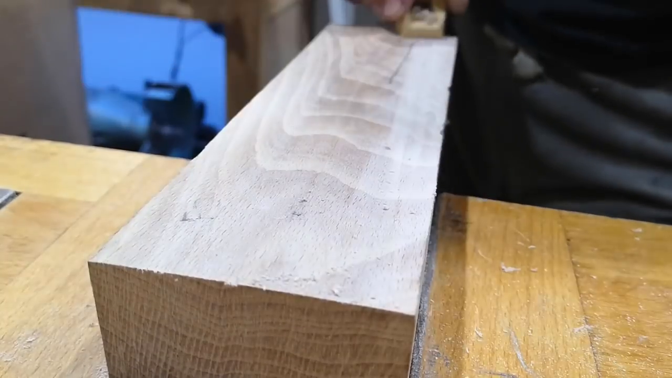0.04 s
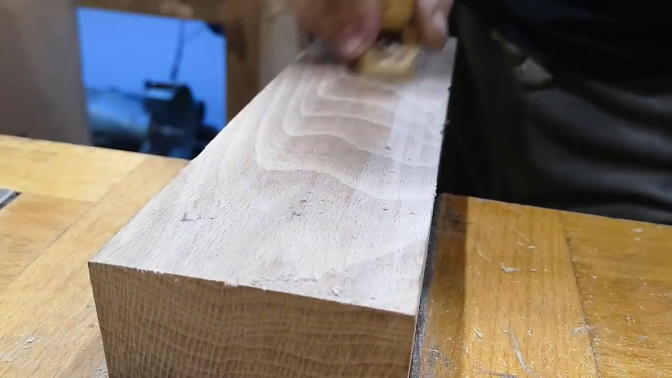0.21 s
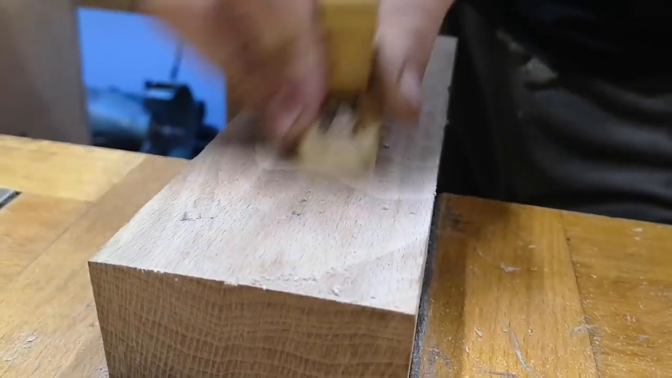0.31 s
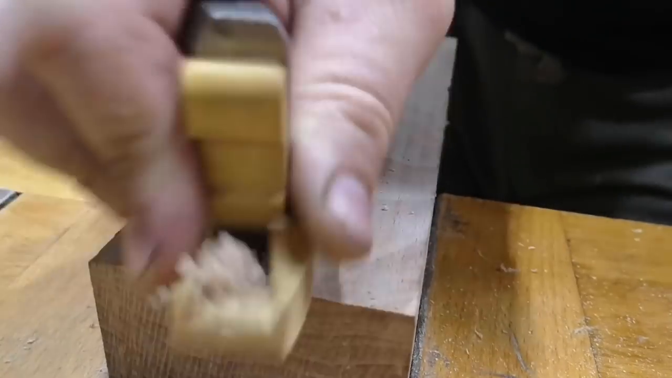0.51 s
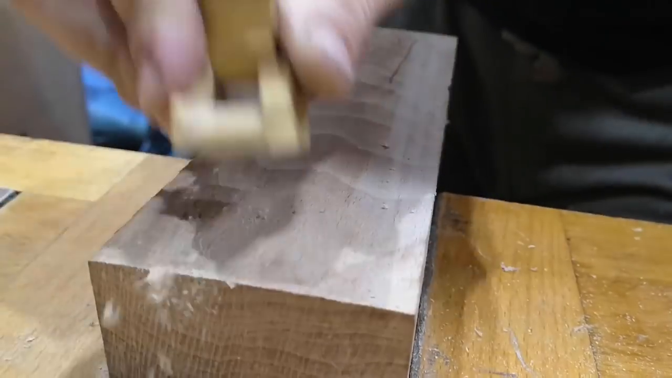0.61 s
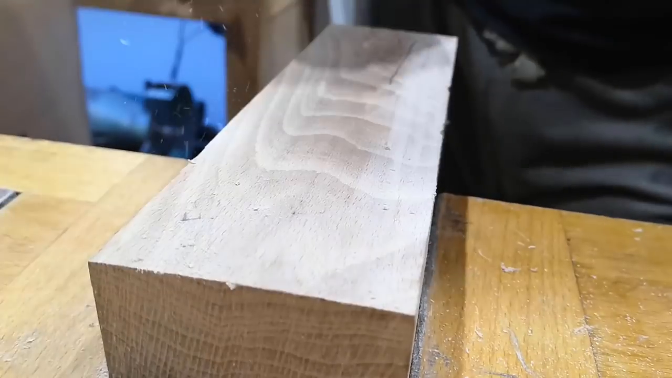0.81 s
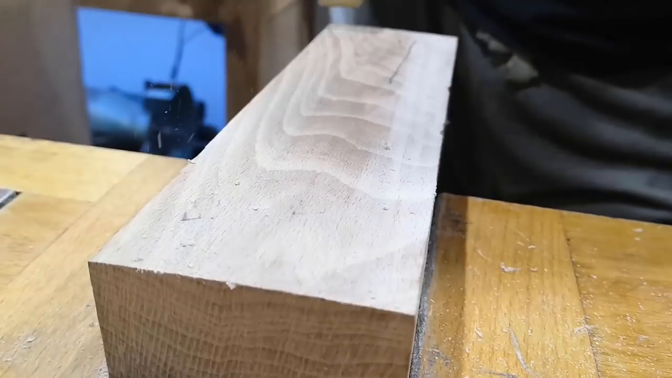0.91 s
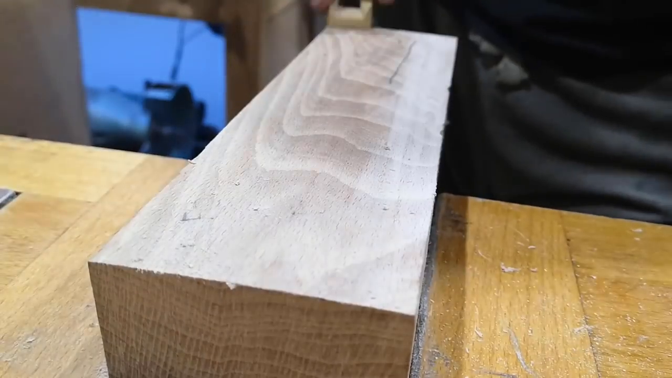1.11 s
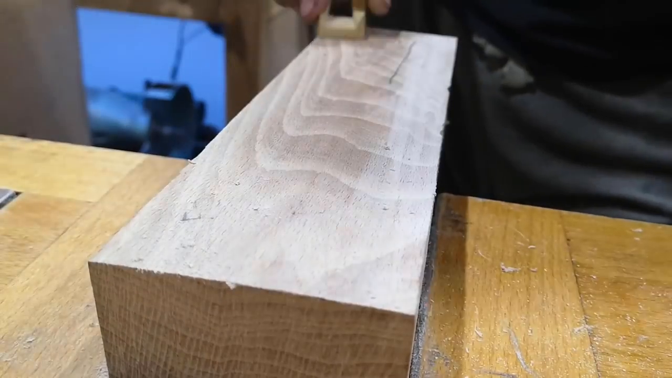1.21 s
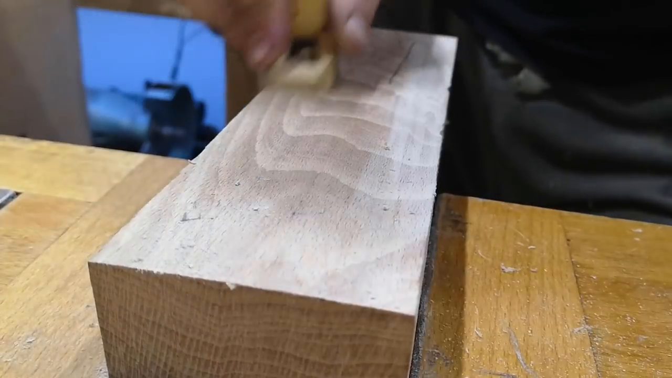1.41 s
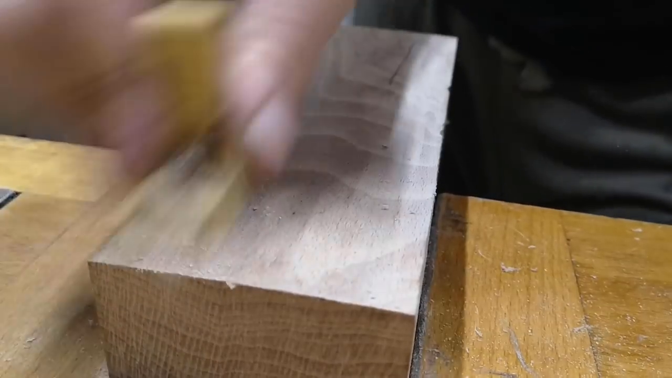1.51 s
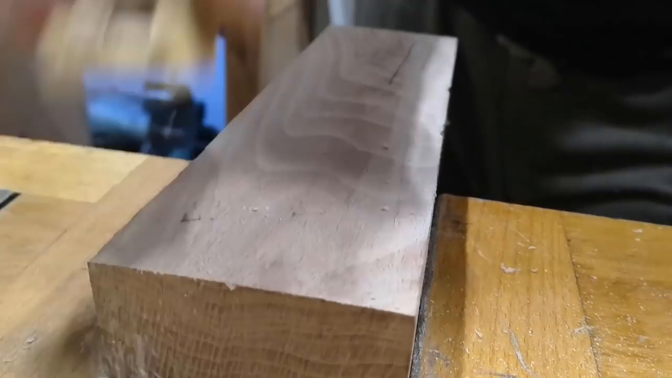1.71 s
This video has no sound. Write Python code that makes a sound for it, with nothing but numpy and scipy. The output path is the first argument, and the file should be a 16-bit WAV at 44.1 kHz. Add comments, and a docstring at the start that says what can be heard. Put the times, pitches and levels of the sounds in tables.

```python
"""A rasping plane stroke dies away on a hardwood board; the next squeals as the blade chatters, then knocks follow
as the plane runs off the end. It is set down again and cuts a clean, swelling stroke in a dry workshop.
Strokes are filtered random snaps (fibres at the blade, sole slipping on the board); the squeal is a wavering sine.
Knocks are decaying modes and noise bursts; scuffs are resonant grains; air and floor are filtered noise."""
import sys
import numpy as np
from scipy import signal
from scipy.fft import rfft, irfft
from scipy.io import wavfile
from scipy.ndimage import uniform_filter1d, map_coordinates

SR = 44100
rng = np.random.default_rng(int(sys.argv[2]) if len(sys.argv) > 2 else 0)


def to_wav(sig):
    """Store sig (one row per channel, or 1-D mono) as 16-bit WAV at the path in sys.argv[1].

    Samples outside -1..1 are clipped; the rate is SR.
    """
    pcm = np.clip(np.atleast_2d(sig), -1, 1) * 32767
    pcm = np.round(pcm).astype(np.int16)
    wavfile.write(sys.argv[1], SR, pcm.T)  # frames by channels


N = 79380  # samples, 1.8 s


def undb(db):
    """Decibels to amplitude gain."""
    return 10 ** (np.asarray(db) / 20)


def unit(x):
    """Scale to rms 1."""
    return x / np.sqrt(np.mean(x ** 2))


def impulse(x):
    """Scale total energy to that of one millisecond at rms 1."""
    return x / np.sqrt(np.sum(x ** 2) / (SR / 1000))


def clock():
    """Time of every sample, s."""
    return np.arange(N) / SR


def fade(t60_s):
    """Exponential decay, 60 dB in t60_s."""
    return np.exp(-np.log(1000) * clock() / t60_s)


def curve(rows, axis):
    """Gain from one dB column of a timed table, -120 dB outside it."""
    rows = np.array(rows)
    return undb(np.interp(clock(), rows[:, 0], rows[:, axis], left=-120, right=-120))


def colour(x, points):
    """Minimum-phase filter through (freq_hz, level_db) points, from a folded cepstrum."""
    freq_hz, level_db = np.array(points).T
    size = 2 * N
    f = np.maximum(np.arange(N + 1) * SR / size, 1)
    gain = undb(np.interp(np.log(f), np.log(freq_hz), level_db))
    cepstrum = irfft(np.log(gain))
    cepstrum[1:N] *= 2
    cepstrum[N + 1:] = 0
    response = np.exp(rfft(cepstrum))
    return irfft(rfft(x, size) * response)[..., :N]


def resonate(x, freq_hz, width_hz):
    """One two-pole resonance."""
    b, a = signal.iirpeak(freq_hz, freq_hz / width_hz, fs=SR)
    return signal.lfilter(b, a, x)


def walk(rate_hz):
    """Smoothed random steps, rms 1."""
    hold = max(int(SR / rate_hz), 1)
    steps = np.repeat(rng.standard_normal(N)[:N // hold + 1], hold)
    return unit(uniform_filter1d(steps, hold)[:N])


def grains(rate_per_s, spread_db):
    """Sparse random snaps of uneven size."""
    hits = rng.random(N) < rate_per_s / SR
    size = rng.standard_normal(N)
    boost_db = max(spread_db, 0) * np.minimum(rng.exponential(size=N), 4)
    return hits * size * undb(boost_db)


def scattered(rate_per_s, spread_db, scatter_db):
    """Snaps common to both ports, plus snaps that reach only one."""
    common = grains(rate_per_s, spread_db)
    separate = np.array([grains(rate_per_s, spread_db), grains(rate_per_s, spread_db)])
    return common + undb(scatter_db) * separate


def delay(pair, seconds):
    """Start a two-channel sound later."""
    return np.pad(pair, ((0, 0), (max(int(seconds * SR), 0), 0)))[:, :N]


def place(x, room, pan_db, lag_ms, room_db):
    """Direct sound lags at the right port; room echoes are mixed in at room_db against it."""
    pair = np.broadcast_to(x, (2, N))
    late = map_coordinates(pair[1], [np.arange(N) - lag_ms * SR / 1000], order=3)
    direct = np.array([pair[0] * undb(pan_db / 2), late * undb(-pan_db / 2)])
    echoes = signal.fftconvolve(pair, room, axes=1)[:, :N]
    return (direct + undb(room_db) * echoes) / np.hypot(1, undb(room_db))


# Loudness of each stroke: time_s, blade_rel_db, sole_rel_db
STROKE_ENDING = [(0.0, -35, -33.5), (0.018, -44, -35.5), (0.03, -48.5, -41.5), (0.076, -71.5, -64),
                 (0.11, -86, -78.5)]
STROKE_SQUEALING = [(0.13, -86.5, -73.5), (0.156, -75.5, -62.5), (0.182, -34, -38), (0.232, -31, -31.5),
                    (0.252, -27.5, -37), (0.342, -28, -33.5), (0.376, -22.5, -33), (0.404, -72, -41),
                    (0.482, -59, -51.5), (0.495, -80, -79)]
STROKE_CLEAN = [(1.238, -70, -55), (1.272, -39.5, -38), (1.308, -40.5, -36.5), (1.518, -21, -32.5),
                (1.528, -21.5, -39), (1.556, -65, -42.5), (1.596, -52.5, -45.5), (1.614, -49, -45.5),
                (1.7, -122.5, -92.5)]
# Spectra of fibres tearing at the blade and of the board under the sole: freq_hz, rel_db
BLADE_SPECTRUM = [(1500,-47),(3000,-27.5),(3700,-17),(4400,-16),(5300,-6.5),(6000,-7),(6600,0.5),(7200,-5),(7900,-8.5),(9000,-17),(10000,-27.5),(11300,-28.5),(15000,-38)]
BOARD_SPECTRUM = [(60,-21),(180,-14),(300,-12),(380,-9),(520,-6.5),(680,-14),(860,-5.5),(1000,-11.5),(1380,1.5),(1700,-1.5),(2150,-0.5),(2650,-9.5),(3050,-19),(3600,-12.5),(4500,-16),(9000,-36.5)]
# One resonance per stroke, against the cut or the rub: freq_hz, width_hz, rel_db
BLADE_RINGS = [(6800,500,-15.5),(7030,450,-19),(6545,450,-7.5)]
BOARD_RINGS = [(1092,130,1),(2143,400,-6),(1445,150,-17)]
BLADE_DB, BOARD_DB = 6, 5
FIBRES_PER_S, FIBRE_SPREAD_DB = 8200, 0.5
RUBS_PER_S, RUB_SPREAD_DB = 2600, 0
GRAIN_HZ, GRAIN_DB = 157.4, -0.8  # the cut catches on the wood grain
BLADE_SCATTER_DB, BOARD_SCATTER_DB = -0.5, 3.5  # one-port snaps against common ones
BLADE_ROOM_DB, BOARD_ROOM_DB, BOARD_PAN_DB = -1.5, 6.5, -1
BLADE_LAG_MS, BOARD_LAG_MS = 0.071, 0.077


def strokes(room):
    """Fibres snap at the blade and ring it; the sole's sticking and slipping rings the board."""
    catch = undb(GRAIN_DB * walk(GRAIN_HZ))
    snaps = catch * scattered(FIBRES_PER_S, FIBRE_SPREAD_DB, BLADE_SCATTER_DB)
    slips = catch * scattered(RUBS_PER_S, RUB_SPREAD_DB, BOARD_SCATTER_DB)
    hiss = unit(colour(snaps, BLADE_SPECTRUM))
    rasp = unit(colour(slips, BOARD_SPECTRUM))
    cut = rub = 0
    levels = [STROKE_ENDING, STROKE_SQUEALING, STROKE_CLEAN]
    for rows, blade, board in zip(levels, BLADE_RINGS, BOARD_RINGS):
        blade_hz, blade_width_hz, blade_db = blade
        board_hz, board_width_hz, board_db = board
        blade_ring = undb(blade_db) * unit(resonate(hiss, blade_hz, blade_width_hz))
        board_ring = undb(board_db) * unit(resonate(rasp, board_hz, board_width_hz))
        cut = cut + curve(rows, axis=1) * unit(hiss + blade_ring)
        rub = rub + curve(rows, axis=2) * (rasp + board_ring)
    cut = shade(place(cut, room, 0, BLADE_LAG_MS, BLADE_ROOM_DB))
    rub = place(rub, room, BOARD_PAN_DB, BOARD_LAG_MS, BOARD_ROOM_DB)
    return undb(BLADE_DB) * cut + undb(BOARD_DB) * rub


# Hands shading the cut from one port or the other: freq_hz, left_minus_right_db
SHADE = [(1500,0.5),(2500,-2),(4000,3.5),(6500,6.5),(8000,1),(10000,2.5),(15000,1)]


def shade(pair):
    """Tip each frequency towards the port that sees the blade best."""
    left = [(freq_hz, db / 2) for freq_hz, db in SHADE]
    right = [(freq_hz, -db / 2) for freq_hz, db in SHADE]
    return np.array([colour(pair[0], left), colour(pair[1], right)])


# Blade chatter: time_s, centre_pitch_hz, rel_db
CHATTER = [(.17,1255,-49),(.185,1311,-37.5),(.197,1317,-28),(.228,1318,-25.5),(.245,1345,-20.5),(.27,1380,-24),(.284,1402,-24.5),(.32,1345,-19.5),(.343,1350,-21.5),(.355,1404,-37),(.39,1357,-59)]
# Surges and stalls as the blade digs in: centre_s, half_length_s, gain_db
SURGES = [(.248,0.0049,7),(0.259,0.0016,-6.5),(0.266,0.0073,5),(0.274,0.0019,-7.5),(0.283,0.0055,7.5),(0.289,0.0032,-7.5),(0.306,.004,9),(0.321,0.0064,11.5),(0.334,0.0033,-11),(0.341,0.0058,3)]
CHATTER_DB, CHATTER_FLUTTER_DB, CHATTER_OVERTONE_DB = -1, 2.3, -23
CHATTER_JITTER = 0.017  # rms fraction of pitch
CHATTER_PAN_DB, CHATTER_ROOM_DB = -1.5, -13


def chatter(room):
    """The blade locks into a wavering squeal with one overtone, in surges."""
    t, rows = clock(), np.array(CHATTER)
    pitch_hz = np.interp(t, rows[:, 0], rows[:, 1]) * (1 + CHATTER_JITTER * walk(250))
    phase = 2 * np.pi * np.cumsum(pitch_hz) / SR
    surge_db = sum(db * np.exp(-((t - at) / half) ** 2) for at, half, db in SURGES)
    flutter_db = CHATTER_FLUTTER_DB * walk(200)
    size = curve(CHATTER, axis=2) * undb(CHATTER_DB + surge_db + flutter_db)
    wave = np.sin(phase) + undb(CHATTER_OVERTONE_DB) * np.sin(2 * phase)
    squeal = np.sqrt(2) * size * wave
    return place(squeal, room, CHATTER_PAN_DB, BOARD_LAG_MS, CHATTER_ROOM_DB)


def ring(modes):
    """Decaying modes of random polarity after one blow, cut at a quarter second."""
    t = clock()[:SR // 4]
    body = 0
    for freq_hz, level_db, t60_s in modes:
        decay = np.exp(-np.log(1000) * t / t60_s)
        polarity = rng.choice([-1, 1])
        body = body + undb(level_db) * decay * polarity * np.sin(2 * np.pi * freq_hz * t)
    return impulse(np.pad(body, (0, N - len(t))))


# Plane against board: start_s, thud_rel_db, clack_rel_db, tick_rel_db, iron_rel_db, left_minus_right_db
KNOCKS = [(.473,-19.5,-43,-41,-34,17),(0.481,-23,-36,-24,-40,13),(0.5015,-23,-8.5,-20,-24.5,4),(0.5048,-13.5,-7,-32,-37,13.5),(0.564,-3,-13.5,-8.5,-19,10),(0.571,-18,-11,-17,-38,-8.5),(0.5832,-8,-4,-18.5,-23,8.5),(.822,-55,-60,-66,-65,-2),(1.1501,-4.5,-7,-7.5,-7,4.5),(1.1532,-8.5,-3,-37,-43.5,1.5)]
# Modes of the board on the bench, the plane body and the iron: freq_hz, rel_db, t60_s
BOARD_MODES = [(110,-8,.18),(182,-2,.15),(270,-5,.11),(373,1,.17),(450,-1,.15),(516,-1,.15),(590,-10,.1),(700,-7,.13),(833,-1,.11),(940,0,.09)]
PLANE_MODES = [(940,-4,0.027),(1176,-2,.06),(1249,5.5,0.039),(1407,9,0.027),(1644,5.5,0.017),(1957,-6.5,0.088),(2217,-20,0.046)]
IRON_MODES = [(3735,-4,.05),(3865,0,.06),(3990,-6,.04),(5720,-19,.06),(7660,-17,.035)]
# Noise spectra of the edge tick and of the crack in the clack: freq_hz, rel_db
TICK_SPECTRUM = [(300,-29.5),(1500,12),(2900,-18),(3700,11),(4700,-2),(6000,-13),(7700,-3.5),(10000,-16),(15000,-22)]
CRACK_SPECTRUM = [(150,-16.5),(400,0),(700,-5),(1400,0.5),(2100,-6),(2900,-24),(8000,-63)]
TICK_T60_S, CRACK_T60_S, CRACK_DB = 0.015, 0.031, 3.5
KNOCK_DB, KNOCK_LAG_MS, KNOCK_ROOM_DB = -9, 0.16, 6


def burst(t60_s, spectrum):
    """Decaying noise, separate at each port, filtered to a spectrum."""
    return impulse(colour(rng.standard_normal((2, N)) * fade(t60_s), spectrum))


def knocks(room):
    """Wood on wood: edge tick, iron ping, plane clack, board thud."""
    out = 0
    for start_s, thud_db, clack_db, tick_db, iron_db, pan_db in KNOCKS:
        tick = burst(TICK_T60_S, TICK_SPECTRUM)
        crack = burst(CRACK_T60_S, CRACK_SPECTRUM)
        clack = np.array([ring(PLANE_MODES), ring(PLANE_MODES)]) + undb(CRACK_DB) * crack
        thud = np.array([ring(BOARD_MODES), ring(BOARD_MODES)])
        blow = undb(thud_db) * thud + undb(clack_db) * clack
        blow = blow + undb(tick_db) * tick + undb(iron_db) * ring(IRON_MODES)
        out = out + place(delay(blow, start_s), room, pan_db, KNOCK_LAG_MS, KNOCK_ROOM_DB)
    return undb(KNOCK_DB) * out


# Light scuffs of the sole: centre_s, half_length_s, freq_hz, width_hz, level_db, left_minus_right_db
SCUFFS = [(0.434,.03,6500,9270,-45,3.5),(0.548,0.032,5000,5000,-47.5,4.5),(1.225,.03,6000,10010,-63,3),(1.586,0.039,7000,8960,-50.5,11),(1.619,.012,4300,800,-45,11.5),(1.622,0.03,1376,300,-46.5,-3),(1.626,0.028,448.4,250,-44,2)]


def scuffs(room):
    """Brief light brushes of the sole: grains through two equal resonances."""
    out = 0
    for centre_s, half_s, freq_hz, width_hz, level_db, pan_db in SCUFFS:
        rubs = grains(RUBS_PER_S, RUB_SPREAD_DB)
        brush = unit(resonate(resonate(rubs, freq_hz, width_hz), freq_hz, width_hz))
        swell = np.exp(-((clock() - centre_s) / half_s) ** 2)
        out = out + place(brush * undb(level_db) * swell, room, pan_db, BOARD_LAG_MS, BLADE_ROOM_DB)
    return out


# Air and handling rumble at the microphone: time_s, thump_db, puff_db
AIR = [(0,-49.5,-57.5),(.2,-72,-48),(.32,-43.5,-55.5),(.352,-31.5,-39),(.41,-43.5,-40),(.53,-36,-34.5),(.62,-45,-37),(.7,-72,-57),(.87,-75,-65),(1.142,-74.5,-63),(1.165,-57.5,-47),(1.51,-47.5,-57),(1.545,-33.5,-37),(1.59,-50,-35),(1.68,-52.5,-49.5),(1.8,-95,-62.5)]
# Spectra of the thumping and of the deep puff: freq_hz, rel_db
THUMP_SPECTRUM = [(30,-14),(70,-5.5),(102,3),(135,-2.5),(180,-1.5),(260,-12),(500,-36.5),(1500,-68.5)]
PUFF_SPECTRUM = [(8,-6.5),(22,0),(42,-2),(65,-15),(130,-25.5),(500,-65)]


def air():
    """Low buffeting, alike at both ports, as the hands sweep past."""
    thump_noise, puff_noise = rng.standard_normal((2, N))
    thump = unit(colour(thump_noise, THUMP_SPECTRUM))
    puff = unit(colour(puff_noise, PUFF_SPECTRUM))
    return curve(AIR, axis=1) * thump + curve(AIR, axis=2) * puff


# Workshop noise floor spectrum: freq_hz, rel_db
FLOOR_SPECTRUM = [(59, -34.5), (100, -9.5), (129, -2.5), (204, -27.5), (252, -10), (558, -19),
                  (1240, -21.5), (1730, -15.5), (11900, -35), (15000, -51)]
FLOOR_DB = -72


def workshop_floor():
    """Steady filtered noise, independent at each port."""
    return undb(FLOOR_DB) * unit(colour(rng.standard_normal((2, N)), FLOOR_SPECTRUM))


# Workshop reverberation: band_centre_hz, t60_s, rel_db
ROOM = [(120,.22,-19),(370,0.17,-2.5),(1414,0.17,-10),(3870,0.21,-13),(9000,0.14,-7.5)]
ROOM_DELAY_S = 0.0046


def workshop():
    """Diffuse echoes for the two ports, each band dying at its own rate."""
    centre_hz = np.array(ROOM)[:, 0]
    log_f = np.log(np.maximum(np.fft.rfftfreq(N, 1 / SR), 1))
    noise = rfft(rng.standard_normal((2, N)))
    out = 0
    for share, (_, t60_s, level_db) in zip(np.eye(len(centre_hz)), ROOM):
        tail = fade(t60_s)
        band = irfft(noise * np.interp(log_f, np.log(centre_hz), share), N)
        out = out + undb(level_db) * band * tail / np.linalg.norm(tail)
    return delay(out, ROOM_DELAY_S)


def scene():
    """The plane's sounds over the quiet of the workshop."""
    room = workshop()
    plane = strokes(room) + chatter(room) + knocks(room) + scuffs(room)
    return plane + air() + workshop_floor()


TOP_HZ = 15100


def record(dry):
    """The recorder cuts the top: elliptic low-pass, order 8, 0.2 dB ripple, 70 dB stop."""
    sos = signal.ellip(8, 0.2, 70, TOP_HZ, fs=SR, output="sos")
    return signal.sosfilt(sos, dry)


dry = scene()
out = record(dry)
to_wav(out)
```